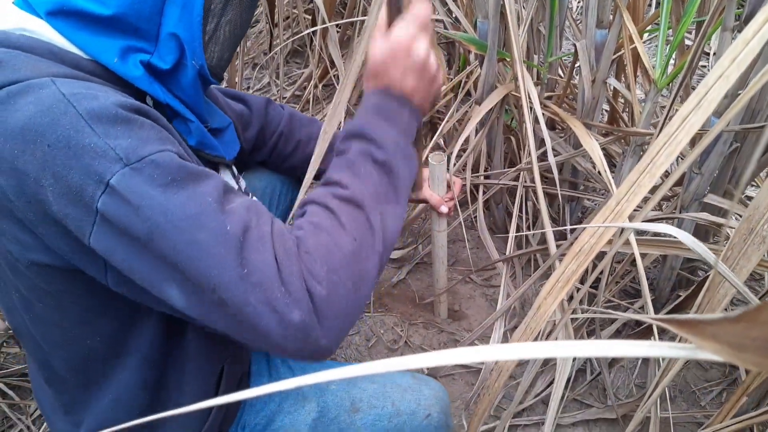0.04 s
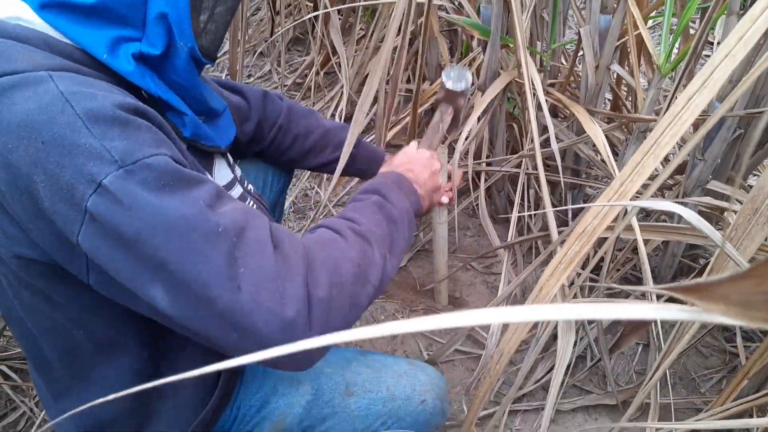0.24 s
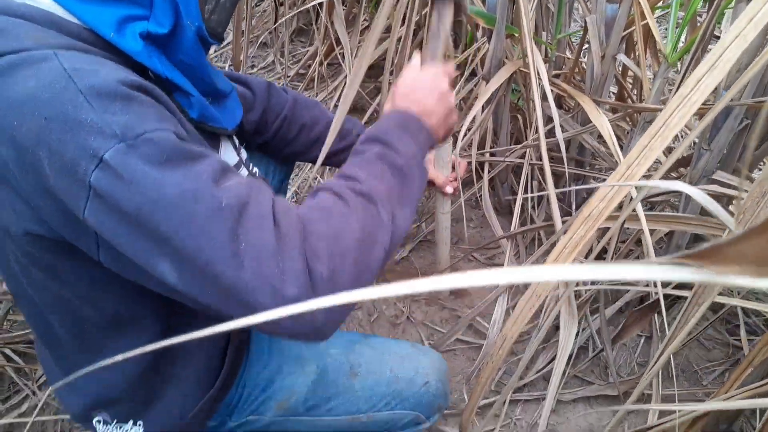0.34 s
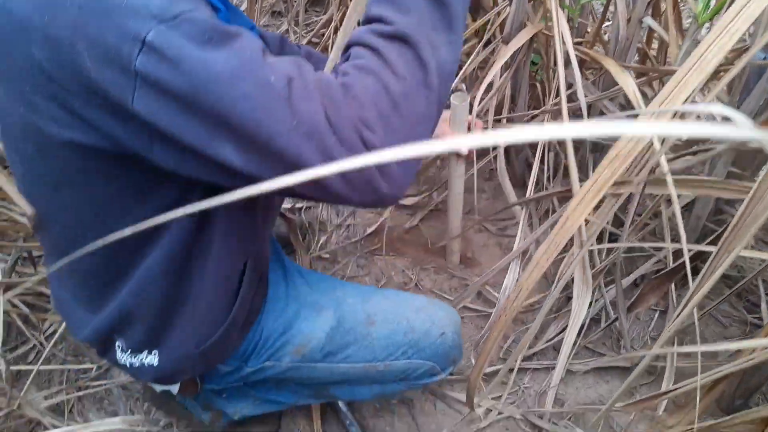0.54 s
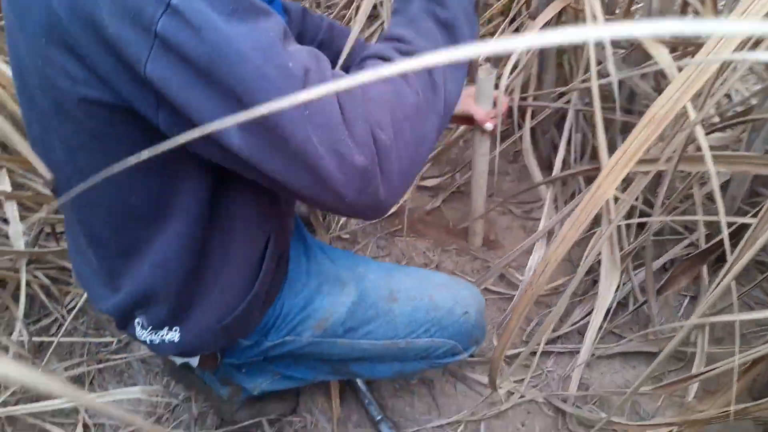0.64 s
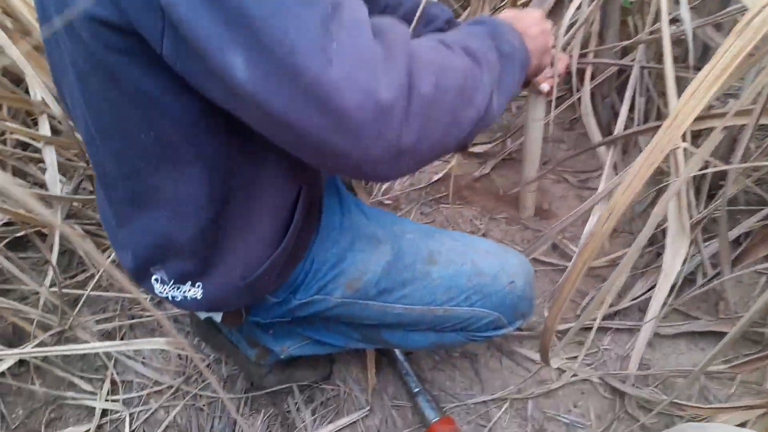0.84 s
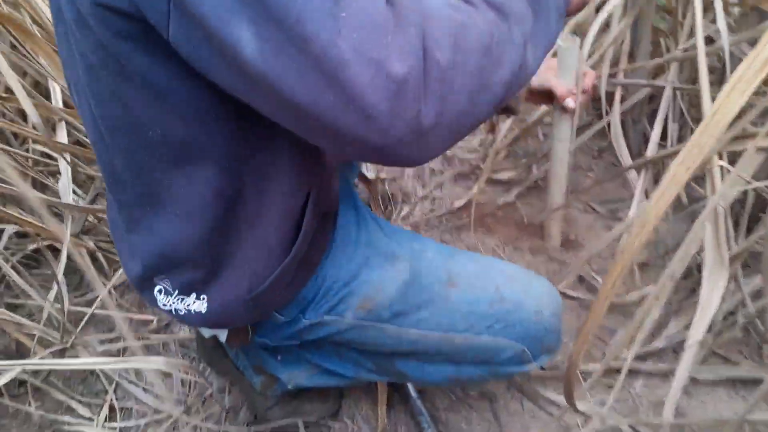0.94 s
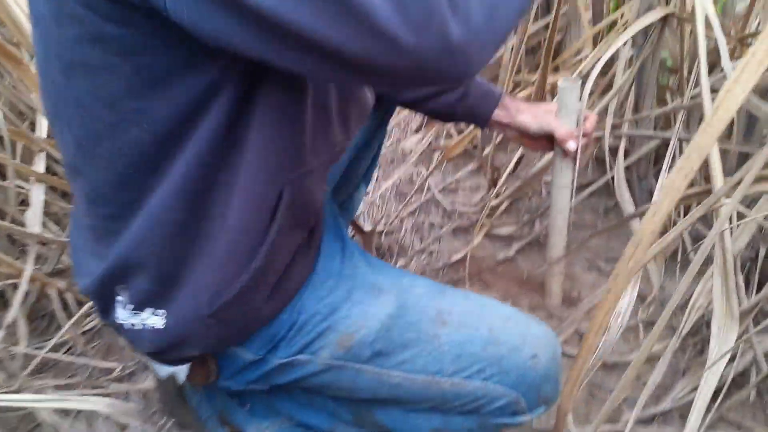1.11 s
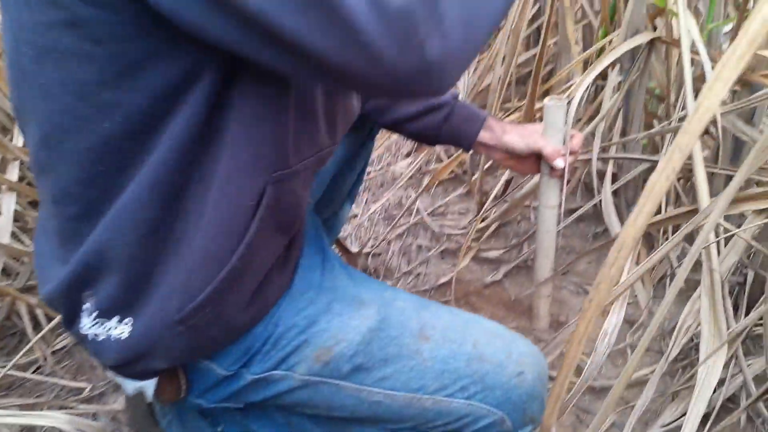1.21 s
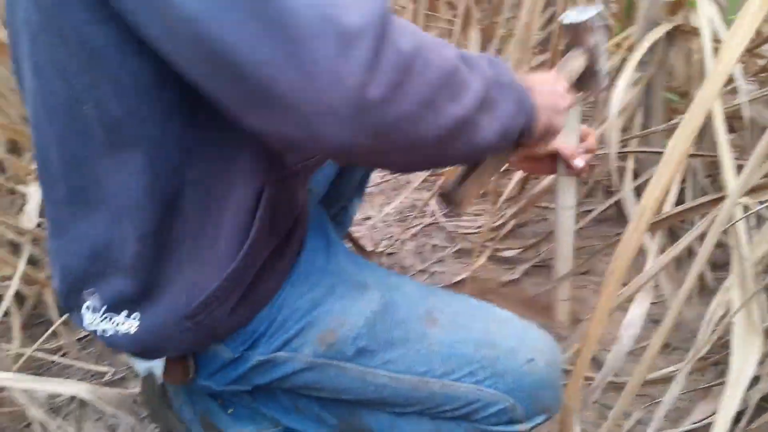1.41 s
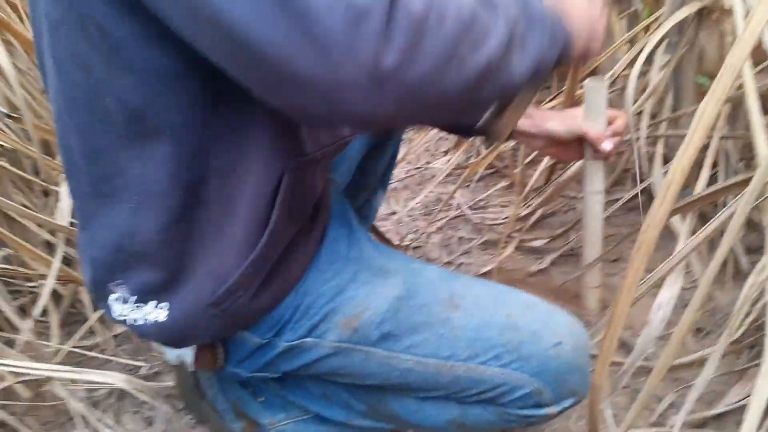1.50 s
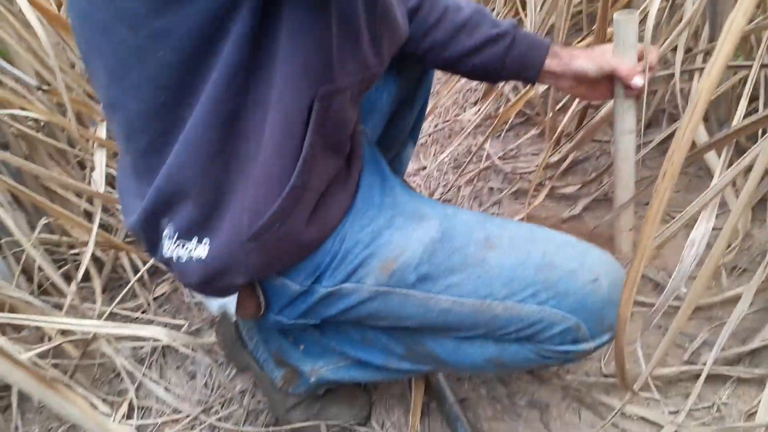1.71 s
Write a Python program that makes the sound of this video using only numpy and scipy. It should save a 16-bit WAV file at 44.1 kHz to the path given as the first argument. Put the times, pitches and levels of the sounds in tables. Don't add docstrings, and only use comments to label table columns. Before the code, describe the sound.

Hammer blows on a plastic pipe in soil, heard close and dry in a quiet field with a faint far engine hum. Small leaf ticks, then a bright hollow crack at 0.2 s with brief steel ringing. Rustling grows to a duller blow at 0.8 s. Ticks and louder cloth and leaf swish from 1.2 s lead to the hardest crack at 1.46 s, then soft bumps as the hum fades.

```python
import sys
import numpy as np
from scipy import signal
from scipy.fft import rfft, irfft
from scipy.io import wavfile
from scipy.ndimage import uniform_filter1d

SR = 44100
rng = np.random.default_rng(int(sys.argv[2]) if len(sys.argv) > 2 else 0)


def level_to_linear(level):
    exponent = np.asarray(level, float) / 20
    return 10 ** exponent


def to_wav(sig):
    pcm = np.clip(np.atleast_2d(sig), -1, 1) * 32767
    pcm = np.round(pcm).astype(np.int16)
    wavfile.write(sys.argv[1], SR, pcm.T)


N = 77175

# (time [s], left lag [s], crack level [dB], thump level [dB], tail level [dB])
BLOWS = [
    (0.2161, -.00002, -17, -27, -20.5),
    (.8320, .00005, -22.5, -28.5, -20),
    (1.4611, .00007, -16, -30.5, -23.5),
]
# (frequency [Hz], left-right [dB])
BLOW_LEAN = [(300, 6), (1400, -7.5), (3000, 1.5), (5000, 13), (8000, 10.5), (15000, 6.5)]
PORT_LAG_S = 0.0001
SIDE = np.array([[.5], [-.5]])


def evened(x):
    return x / np.sqrt(np.mean(x ** 2) + 1e-20)


def read(points, hz):
    f, value = np.transpose(points)
    return np.interp(np.log(hz + 1), np.log(f + 1), value)


def add(mix, s, sound):
    part = mix[:, round(s * SR):][:, :sound.shape[1]]
    part += sound[:, :part.shape[1]]


def ports(left, right, colour, lean, same, lag_s):
    hz = np.fft.rfftfreq(len(left), 1 / SR)
    a, b = rfft(left), rfft(right)
    likeness = np.clip(read(same, hz), 0, 1)
    tilt_db = read(lean, hz) / 2
    b = likeness * a + np.sqrt(1 - likeness ** 2) * b
    b = b * np.exp(-2j * np.pi * hz * lag_s)
    pair = np.array([a * level_to_linear(tilt_db), b * level_to_linear(-tilt_db)])
    return irfft(pair * level_to_linear(read(colour, hz)), len(left))


def patchy(x, patch_db, flicker_db):
    z = signal.stft(x, nperseg=256)[2]
    swells = uniform_filter1d(rng.standard_normal(z.shape[1:]), size=5, axis=0)
    patches = evened(uniform_filter1d(swells, size=14, axis=1))
    flicker = evened(uniform_filter1d(rng.standard_normal(z.shape[2]), size=3))
    return signal.istft(z * level_to_linear(patch_db * patches + flicker_db * flicker), nperseg=256)[1][:, :N]


def field():
    # (frequency [Hz], level [dB])
    air_colour = [(25, -19), (55, -7), (110, -11), (170, -17), (574, -23.5), (1700, -27.5), (6000, -38),
                  (16000, -50.5)]
    # (frequency [Hz], likeness [0-1])
    air_same = [(30, 0.79), (300, 0.79), (2000, 0.55), (10000, .2)]
    hum_hz, hum_width_hz, hum_waver = 92, 9, 0.18
    a, b, c = rng.standard_normal((3, N))
    t = np.arange(N) / SR
    hz = np.fft.rfftfreq(N, 1 / SR)
    air = evened(ports(a, b, air_colour, [(1, 0.0018)], air_same, 0))
    waver = evened(irfft(rfft(c) / (1 + ((hz - hum_hz) / hum_width_hz) ** 2), N))
    hum = np.sin(2 * np.pi * hum_hz * t) + hum_waver * waver
    air_duck = sum((t > row[0]) * np.exp(-((t - row[0]) / .17) ** 4) for row in BLOWS)
    hum_duck = sum((t > row[0]) * np.exp(-abs(t - row[0]) / 0.43) for row in BLOWS)
    fade_db = -6.5 * np.clip((t - 1.48) / .06, 0, 1)
    air_db = -68 - 4 * air_duck + fade_db / 2
    hum_db = -64 - 6 * hum_duck + fade_db
    return level_to_linear(air_db) * air + hum * level_to_linear(hum_db)


def rustle():
    # (time [s], level [dB])
    swing = [(.03, -79), (.2, -75), (.37, -82), (0.451, -68.5), (.58, -59.5), (0.638, -51.5), (0.811, -46),
             (.92, -57.5), (1.226, -56.5), (1.245, -49), (1.3, -47.5), (1.34, -44), (1.39, -39),
             (1.431, -38.5), (1.459, -43.5), (1.561, -66), (1.62, -57.5), (1.75, -58)]
    # (frequency [Hz], level [dB])
    rustle_colour = [(120, -20.5), (300, -3), (600, -4), (1300, 0.5), (9260, -1.5), (12700, -8),
                     (15750, -18.5), (16000, -45.5)]
    # (frequency [Hz], likeness [0-1])
    rustle_same = [(130, .9), (400, 0.91), (1000, 0.07), (2000, 0.029), (10000, 0.017)]
    # (frequency [Hz], left-right [dB])
    rustle_lean = [(200, 4), (1000, -5.5), (4000, 1.5), (15000, 12.5)]
    grains_per_s, grain_db, grain_spread_db = 2000, -5, 3.2
    cloth_hz, cloth_knee_db, cloth_follow = 750, -50, 0.49
    a, b = rng.standard_normal((2, N))
    size = rng.exponential(1, (2, N))
    falls = rng.random((2, N)) < grains_per_s / SR
    grains = level_to_linear(grain_spread_db * np.minimum(size, 3)) * falls * np.sign(a)
    a, b = np.array([a, b]) + level_to_linear(grain_db) * evened(grains)
    hiss = ports(a, b, rustle_colour, rustle_lean, rustle_same, PORT_LAG_S)
    hiss = evened(patchy(hiss, patch_db=1.3, flicker_db=1.1))
    cloth = irfft(rfft(hiss) / (1 + (np.fft.rfftfreq(N, 1 / SR) / cloth_hz) ** 6), N)
    swing_db = np.interp(np.arange(N) / SR, *np.transpose(swing))
    cloth_db = swing_db - (1 - cloth_follow) * np.maximum(swing_db - cloth_knee_db, 0)
    return (hiss - cloth) * level_to_linear(swing_db) + cloth * level_to_linear(cloth_db)


def bump(s, db, hz, t60):
    t = np.arange(8000) / SR
    knock = level_to_linear(db - 60 * t / t60) * (1 - np.exp(-t / 0.0009)) * np.sin(2 * np.pi * hz * t)
    return s, np.tile(knock, (2, 1))


def tick(s, db, hz, t60, width):
    t = np.arange(4096) / SR
    a, b = rng.standard_normal((2, len(t)))
    top_hz = min(hz * (1 + width), 11000)
    end_hz = min((1 + 3 * width) * top_hz, 16000)
    colour = [(hz / (1 + 3 * width), -25), (hz / (1 + width / 3), 0), (top_hz, -5), (end_hz, -38)]
    snap = ports(a, b, colour, [(1, 4)], [(1, 0.13)], 0)
    return s, evened(snap) * level_to_linear(db - 60 * t / t60) * np.minimum(t / 0.00026, 1)


def steel_head(s, db, t60):
    # (frequency [Hz], level [dB])
    steel_modes = [
        (11720, -7.5),
        (11910, -3.5),
    ]
    t = np.arange(8000) / SR
    drift = uniform_filter1d(rng.standard_normal((2, len(t))), size=250, axis=1)
    flutter = 1 + 0.87 * evened(drift)
    pair = sum(f * level_to_linear(level_db) * np.sin(2 * np.pi * (hz * t + rng.random()))
               for (hz, level_db), f in zip(steel_modes, flutter))
    return s, pair * level_to_linear(db - 60 * t / t60) * (1 - np.exp(-t / 0.0036)) * level_to_linear(6 * SIDE)


def soil_thump(t, thump_db, pitch, deep_db, rebound_db):
    # (frequency [Hz], level [dB], decay t60 [s], rise [s], delay [s])
    soil_modes = [
        (250, 6.5, 0.021, 0.003111, .0045),
        (92.2, -10.5, 0.045, .006, 0.02),
    ]
    knock, deep = np.array(soil_modes)
    knock = knock * [pitch, 1, 1, 1, 1]
    deep = deep + [0, deep_db, 0, 0, 0]
    rebound = knock + [0, rebound_db, 0, 0, .011]
    soil = 0
    for hz, db, t60, rise, delay in (knock, deep, rebound):
        late = np.maximum(t - delay + 4 * rise, 0)
        swell = np.exp(-np.minimum(t - delay, 0) ** 2 / rise ** 2)
        shape = swell * level_to_linear(-60 * np.maximum(t - delay, 0) / t60)
        soil = soil + level_to_linear(thump_db + db) * shape * np.sin(2 * np.pi * hz * late) * np.minimum(t / 0.001, 1)
    soil = signal.lfilter(*signal.butter(2, 55, "high", fs=SR), soil)
    return soil * level_to_linear(-1.2 * SIDE)


def stalk_tail(t, tail_db):
    # (frequency [Hz], level [dB])
    stalk_colour = [(150, -19.5), (400, -4.5), (910, -14.5), (2690, -4), (3120, -3), (6560, -15),
                    (11900, -12), (15300, -42)]
    # (frequency [Hz], decay t60 [s])
    stalk_t60 = [(100, 0.084), (700, 0.072), (3000, 0.081), (12000, 0.064)]
    a, b = rng.standard_normal((2, len(t)))
    noise = evened(ports(a, b, stalk_colour, BLOW_LEAN, [(300, 0.69), (3000, .4)], 0))
    hz, frames, z = signal.stft(noise, SR, nperseg=128)
    fade = level_to_linear(tail_db - 60 * frames / read(stalk_t60, hz)[:, None])
    linger = level_to_linear(tail_db - 30 - 60 * frames / .2)
    tail = signal.istft(z * (fade + linger), SR, nperseg=128)[1]
    return tail[:, :len(t)] * np.minimum(t / 0.00097, 1)


def crack(t, crack_db):
    # (frequency [Hz], level [dB])
    crack_colour = [(2500, -19.5), (5000, 4), (7000, -5), (10000, -4), (12500, -9.5), (16500, -23)]
    late_s, rise_s, hold_s, t60 = 0.00043, 0.00035, 0.00057, 0.032
    a, b = rng.standard_normal((2, len(t)))
    burst = evened(ports(a, b, crack_colour, BLOW_LEAN, [(1000, 0.51), (10000, 0.47)], PORT_LAG_S))
    burst = burst * np.clip((t - late_s) / rise_s, 0, 1)
    burst = burst * level_to_linear(crack_db - 60 * np.maximum(t - hold_s, 0) / t60)
    return burst * (1 + level_to_linear(3.5 - 60 * t / 0.0085))


def pipe_ring(t, modes, lag_s, pulse_s, scatter):
    turns = scatter * (rng.random(14) - .5) + 1 / 4
    ring = 0
    for (hz, db, t60, lean_db), turn in zip(modes, turns):
        wave = np.sin(2 * np.pi * (hz * (t - pulse_s - SIDE * lag_s) + turn))
        ring = ring + level_to_linear(db + SIDE * lean_db - 60 * t / t60) * wave
    return ring * (1 - np.exp(-t / 0.00081)) ** 2


def blow(row, modes, seating):
    s, lag_s, crack_db, thump_db, tail_db = row
    pulse_s, scatter, pitch, deep_db, rebound_db = seating
    t = np.arange(8192) / SR
    sound = pipe_ring(t, modes, lag_s, pulse_s, scatter) + crack(t, crack_db)
    return s, sound + stalk_tail(t, tail_db) + soil_thump(t, thump_db, pitch, deep_db, rebound_db)


def scene():
    # (time [s], level [dB], frequency [Hz], decay t60 [s])
    bumps = [(0.269, -57.5, 168.3, 0.16), (0.284, -64, 250, 0.15), (.72, -59.5, 188, 0.14),
             (0.857, -44.5, 171, 0.16), (.92, -60, 250, .09), (0.971, -56, 180, 0.055),
             (1.2, -59.5, 242, 0.079), (1.26, -55, 272, 0.098), (1.308, -56, 233.6, 0.24),
             (1.37, -55.5, 240, 0.078), (1.501, -53, 320, 0.078), (1.516, -56.5, 178.3, .16),
             (1.55, -63, 288, 0.1), (1.584, -62, 184.2, 0.19), (1.589, -59.5, 82.6, 0.072),
             (1.635, -63, 265, 0.092)]
    # (time [s], level [dB], pitch [Hz], decay t60 [s], breadth [ratio])
    ticks = [(.0085, -57.5, 4100, 0.059, 0.37), (.008, -61, 1090, 0.057, 0.16),
             (.107, -66.5, 5000, .03, 0.76), (.105, -65, 1570, .04, 0.33), (.007, -58, 9900, 0.072, 0.27),
             (.296, -63, 2110, 0.12, .12), (0.2963, -57, 6500, 0.047, 0.95), (0.309, -58, 8700, 0.084, .3),
             (.352, -69, 4300, 0.027, .3), (0.396, -57, 834, 0.028, 0.16),
             (0.3959, -54.5, 1900, 0.029, 1.4), (.41, -60.5, 5500, 0.059, 1.2),
             (0.554, -52.5, 4200, 0.016, .5), (.642, -53, 1030, 0.038, 0.39),
             (0.958, -54.5, 7640, 0.013, .7), (1.018, -52.5, 2446, 0.039, 0.51),
             (1.031, -44.5, 5500, 0.0089, 0.78), (1.039, -58, 8800, 0.0067, .7),
             (1.0562, -46.5, 4200, 0.011, 0.95), (1.088, -52.5, 3080, 0.023, 0.78),
             (1.112, -45.5, 3600, 0.0073, .7), (1.2377, -52, 7240, 0.018, 1.1), (.27, -65, 1010, .2, 0.23),
             (1.27, -56, 3300, 0.32, 0.093), (1.3, -54, 1600, .3, 0.065), (1.371, -56.5, 1160, .2, 0.094),
             (1.3844, -32.5, 9100, 0.017, 0.43)]
    # (time [s], level [dB], decay t60 [s])
    rattles = [
        (0.225, -49.5, .15),
        (0.261, -50, 0.16),
        (0.297, -49, 0.11),
        (0.843, -50.5, 0.31),
        (0.901, -56, 0.16),
        (1.468, -58, 0.17),
        (1.5, -49, 0.095),
    ]
    # (frequency [Hz], level [dB], decay t60 [s], left-right [dB])
    pipe_first = [(455, -21, 0.022, 3), (707, -8.5, 0.023, -4.5), (1080, -18.5, 0.024, -11.5),
                  (1401, -8, 0.018, -7), (1784, -10.5, .028, -5.5), (2145, -5.5, 0.02, 3),
                  (2475, -9, 0.013, -12), (2928, -7.5, 0.018, -10.5), (3340, -6, 0.014, 11.5),
                  (3993, -18.5, 0.025, 4), (4634, -4, 0.0097, 5), (5660, -13, 0.015, 3.5),
                  (6180, -28, 0.033, 3.5)]
    pipe_second = [(490, -26, 0.0512, 2.5), (752, -9.5, 0.027, -3.5), (1149, -14.5, 0.023, -8),
                   (1493, -10.5, 0.017, -8), (1937, -12, 0.024, -1), (2200, -11.5, 0.024, -2),
                   (2778, -3.5, 0.011, -7.5), (3290, -11.5, 0.017, 18), (3680, -17, 0.015, -4),
                   (4450, -11, 0.015, 3), (5000, -21.5, 0.029, 10.5), (5935, -7.5, 0.0079, -15),
                   (7410, -12, .018, 6)]
    pipe_third = [(2500, -12.5, 0.011, -5.5), (809, -5.5, 0.018, -3.5), (1235, 0.5, 0.0088, -9.5),
                  (1757, -10, 0.022, -8), (2180, -0.5, 0.008, 2), (3036, -1.5, 0.014, -6),
                  (3430, -3.5, 0.0096, -7), (3787, -5.5, 0.007, -3.5), (4450, -11.5, 0.018, -0.5),
                  (4750, -5, 0.02, 2), (5870, -15, 0.014, -9), (6340, -14, 0.02, 6),
                  (7360, -36.5, 0.018, 9.5)]
    # (first pulse up the pipe [s], mode scatter [0-1], knock pitch [ratio], deep thump [dB], rebound [dB])
    seatings = [
        (.0006, 0.61, 1.01, -6.5, -14),
        (.0015, .95, 0.974, 2.5, -21.5),
        (.0017, .75, .96, 6.5, -8.5),
    ]
    mix = field() + rustle()
    for row in bumps:
        add(mix, *bump(*row))
    for row in ticks:
        add(mix, *tick(*row))
    for row in rattles:
        add(mix, *steel_head(*row))
    for row, modes, seating in zip(BLOWS, (pipe_first, pipe_second, pipe_third), seatings):
        add(mix, *blow(row, modes, seating))
    return mix


def roll_off(x):
    return signal.sosfilt(signal.butter(12, 16830, fs=SR, output="sos"), x)


def record(dry):
    edge = signal.firwin(255, 16450, window=("kaiser", 9), fs=SR)
    mix = signal.oaconvolve(np.clip(dry, -.95, .95), edge[None], "same")
    return roll_off(mix)


dry = scene()
out = record(dry)
to_wav(out)
```